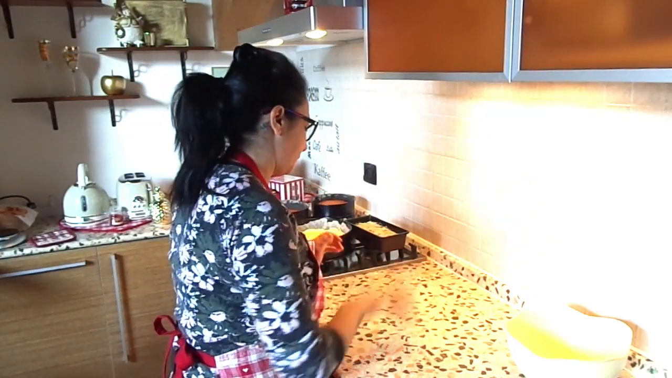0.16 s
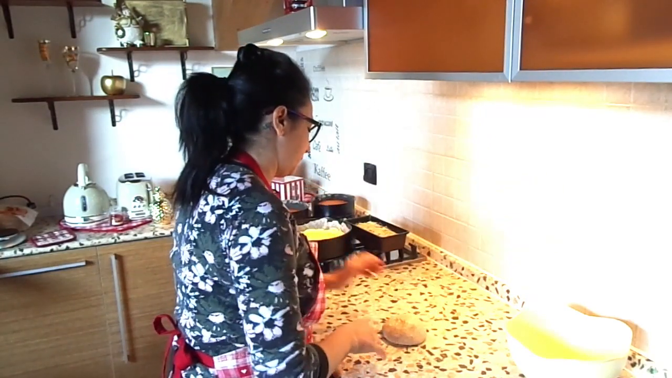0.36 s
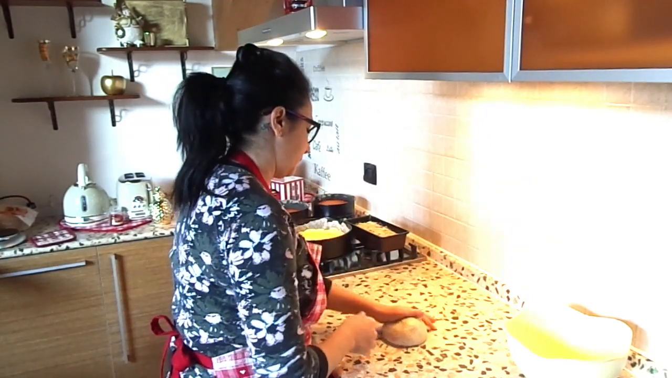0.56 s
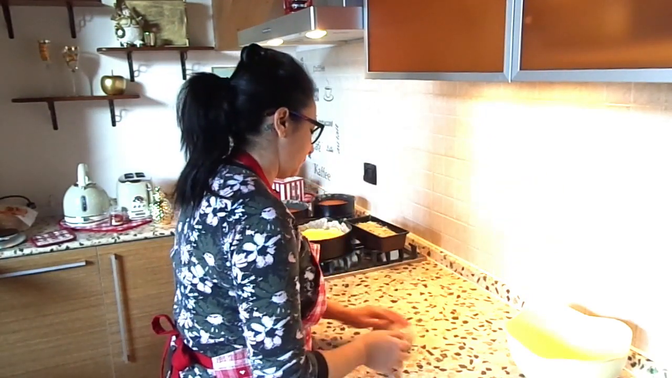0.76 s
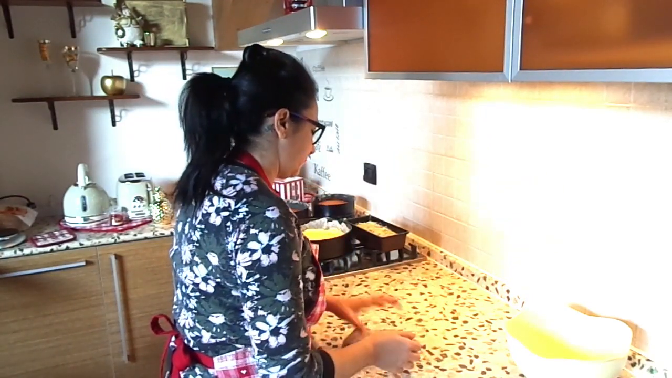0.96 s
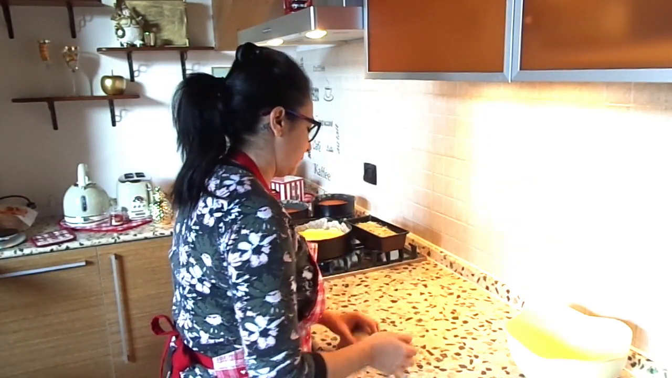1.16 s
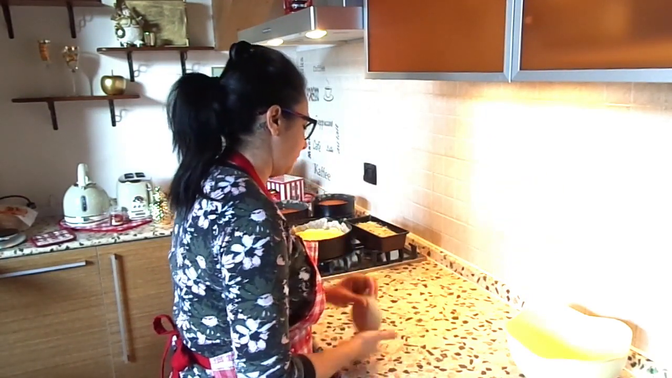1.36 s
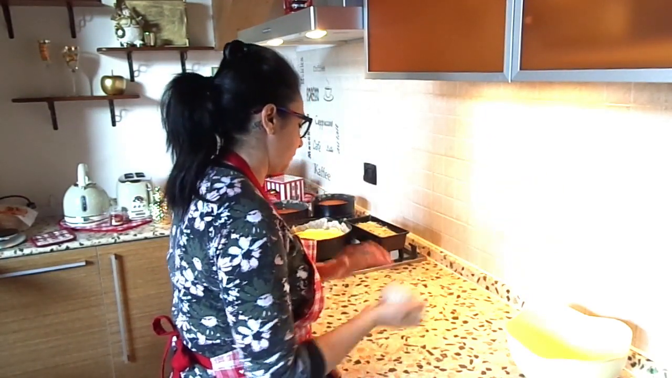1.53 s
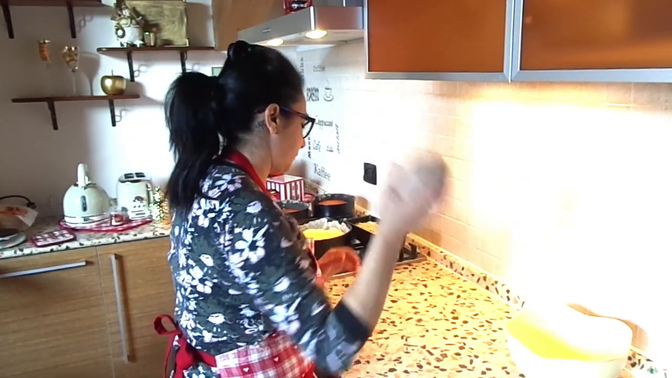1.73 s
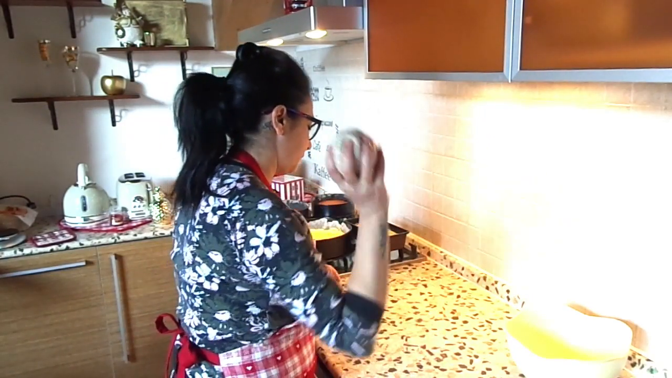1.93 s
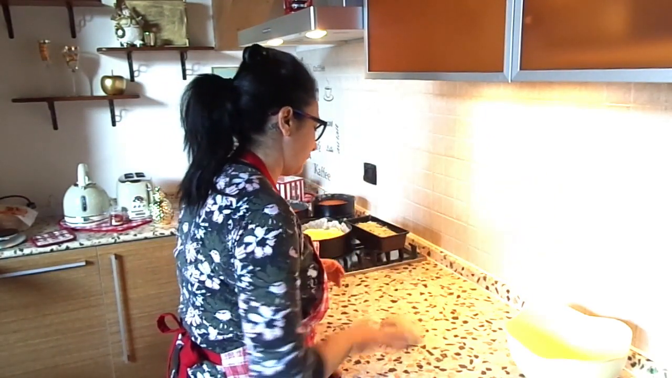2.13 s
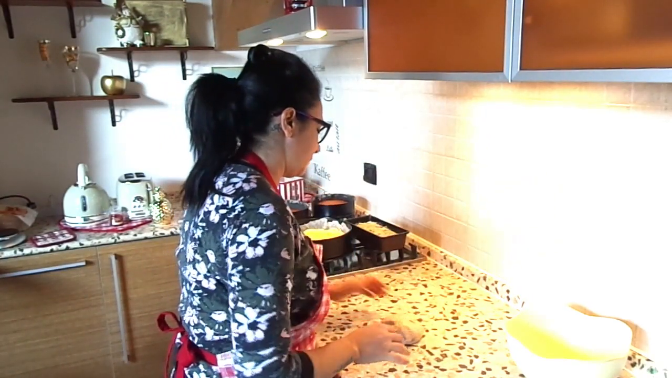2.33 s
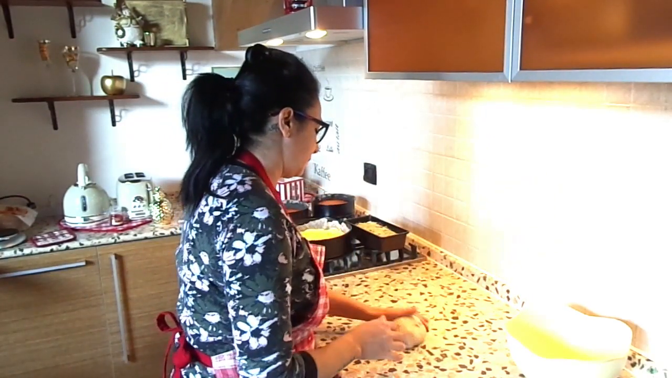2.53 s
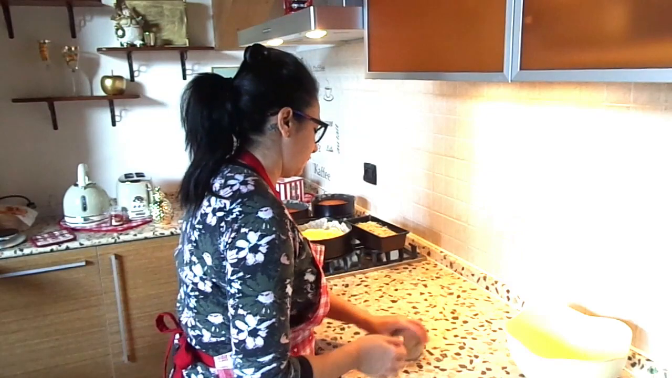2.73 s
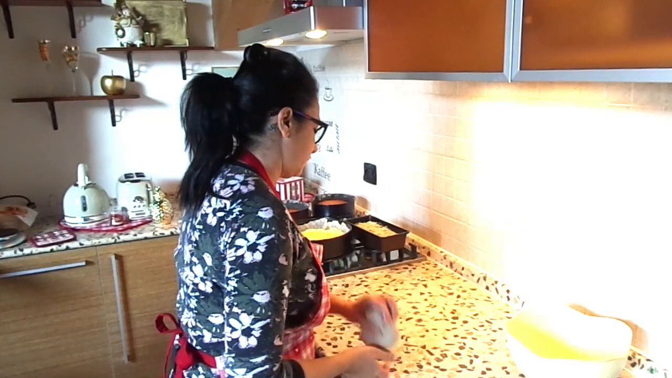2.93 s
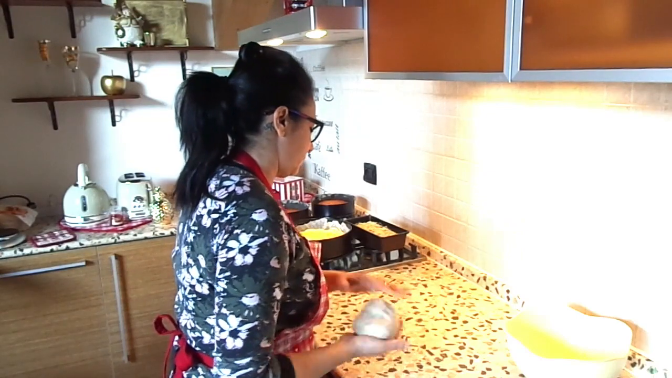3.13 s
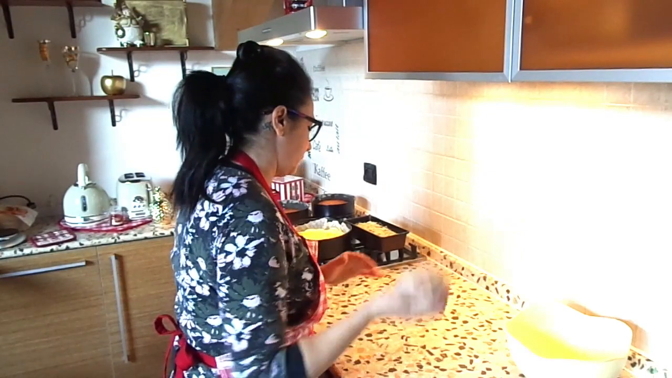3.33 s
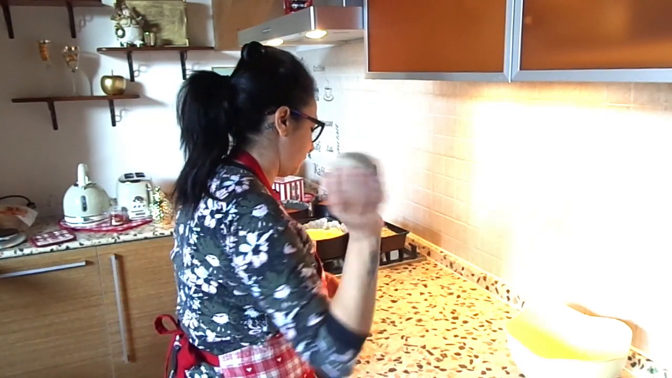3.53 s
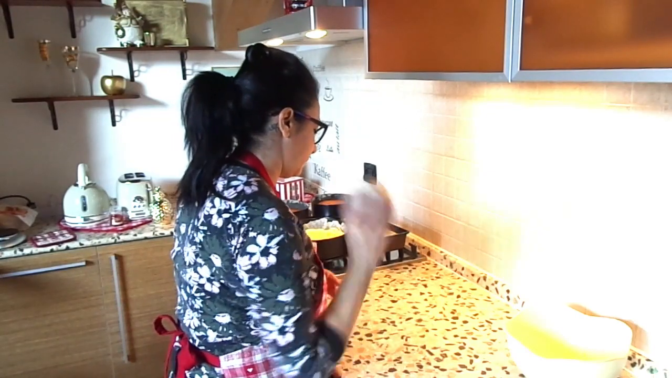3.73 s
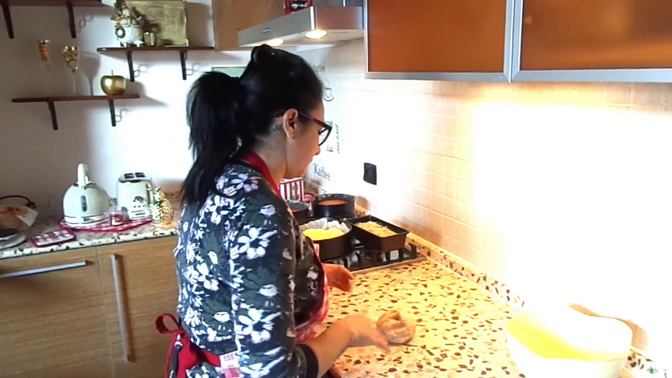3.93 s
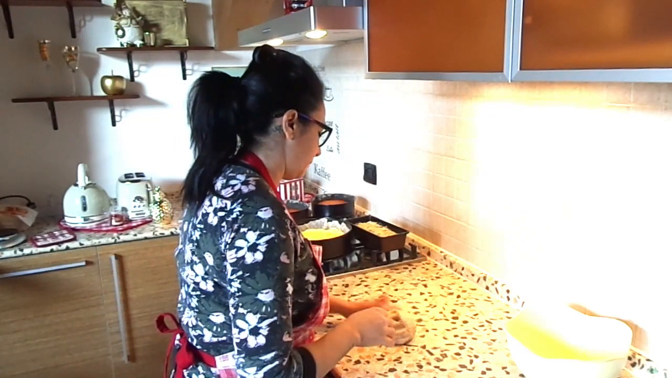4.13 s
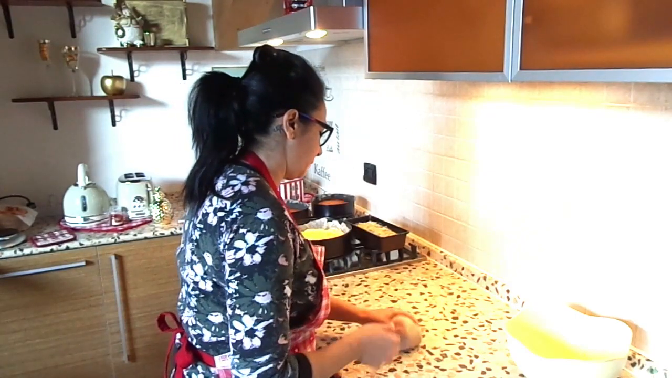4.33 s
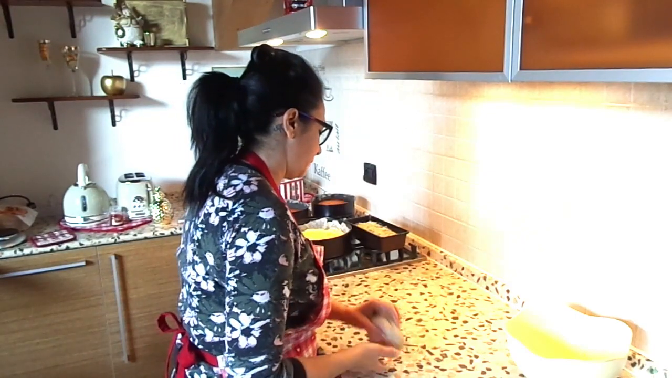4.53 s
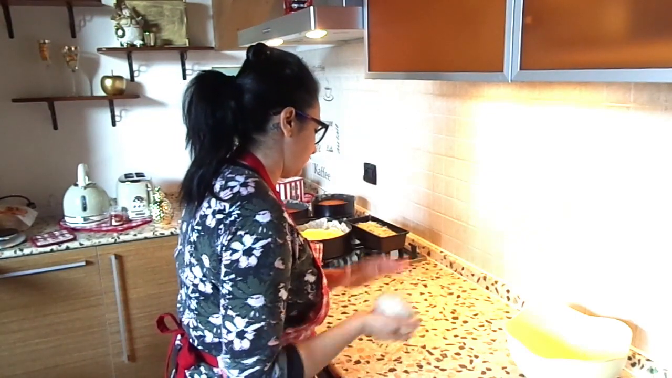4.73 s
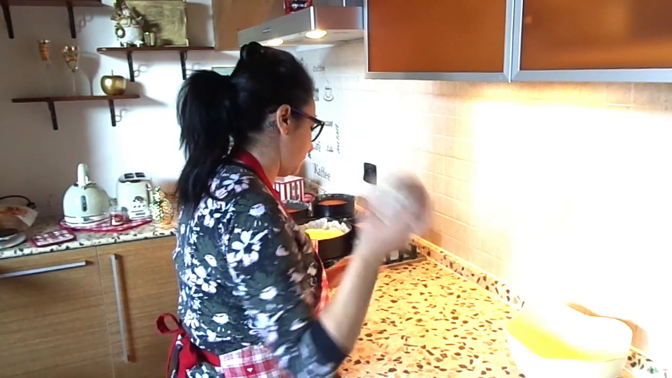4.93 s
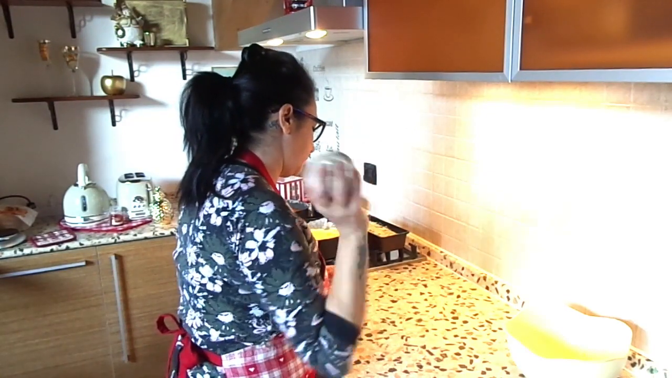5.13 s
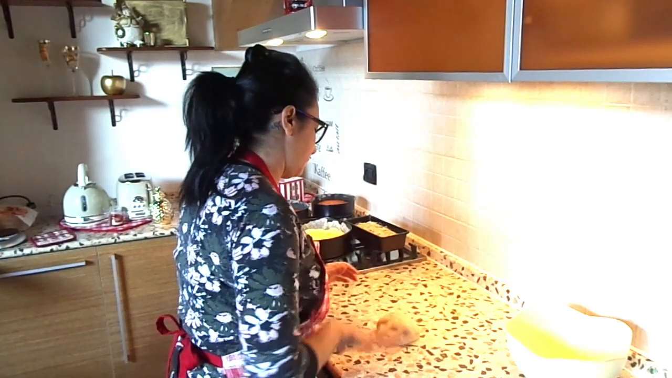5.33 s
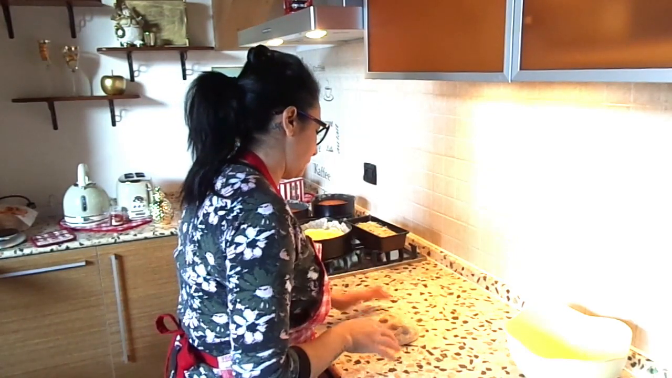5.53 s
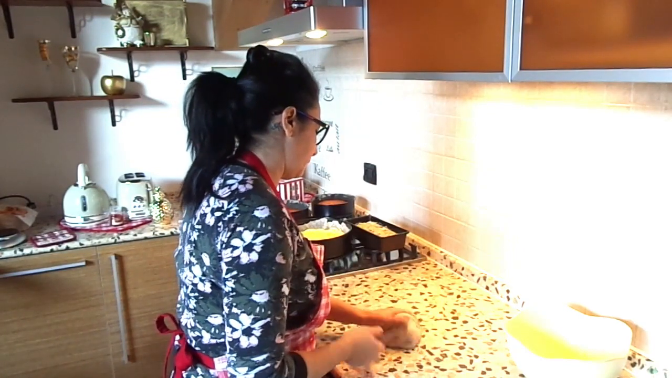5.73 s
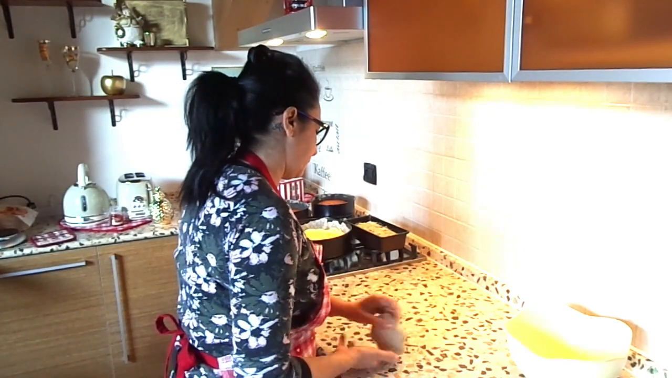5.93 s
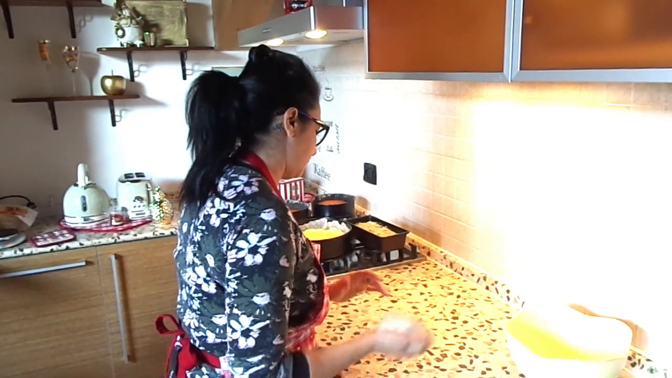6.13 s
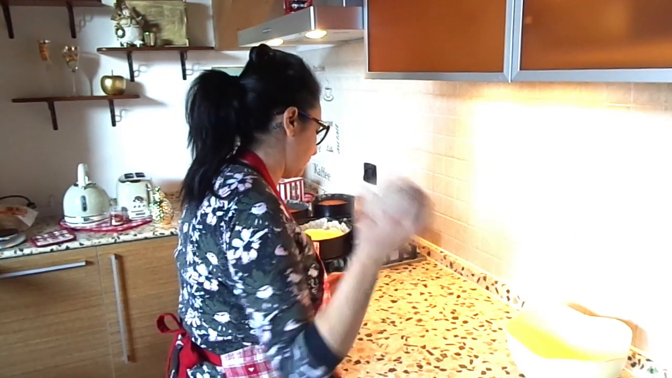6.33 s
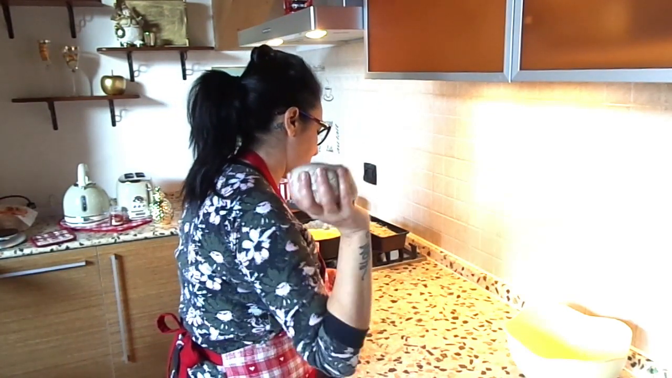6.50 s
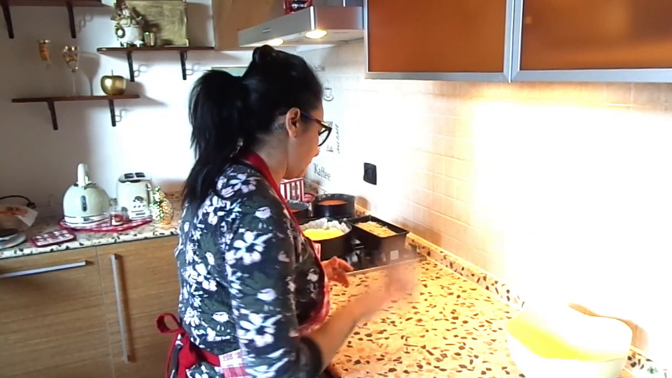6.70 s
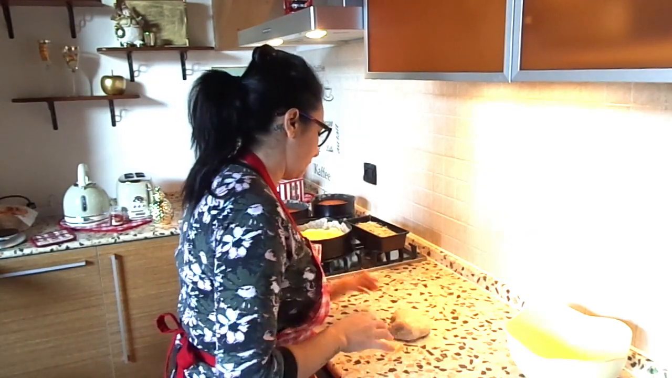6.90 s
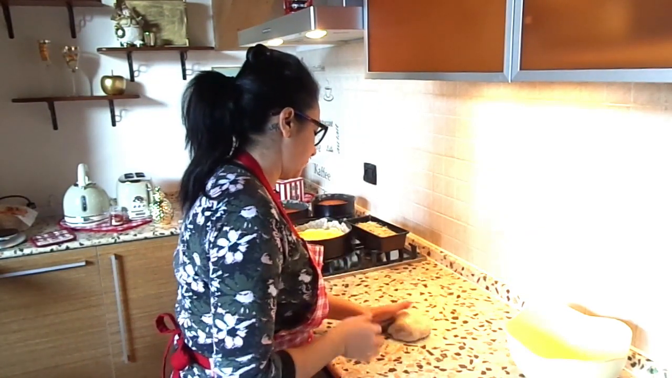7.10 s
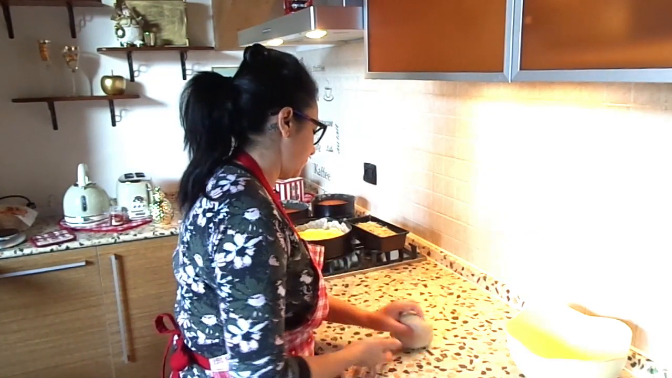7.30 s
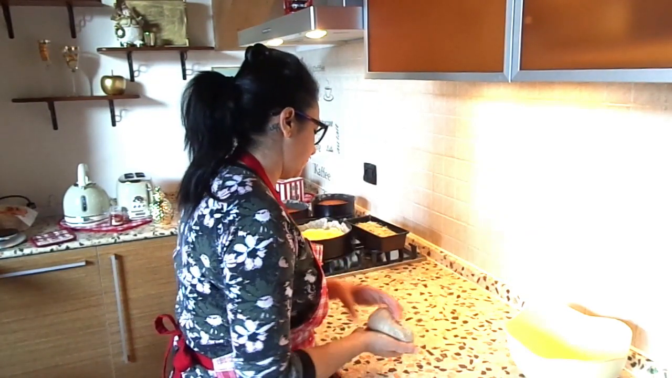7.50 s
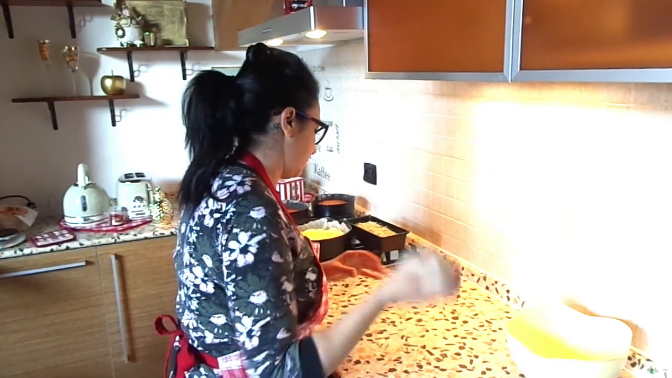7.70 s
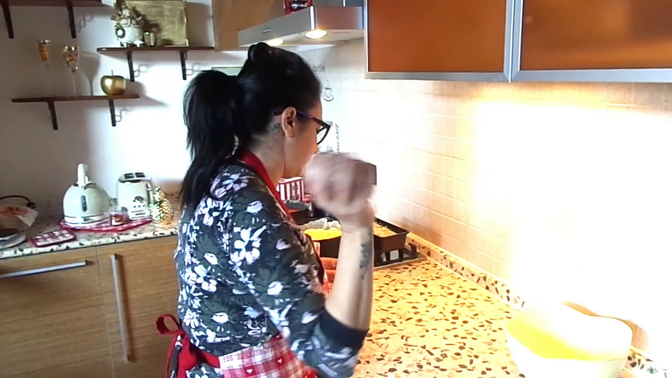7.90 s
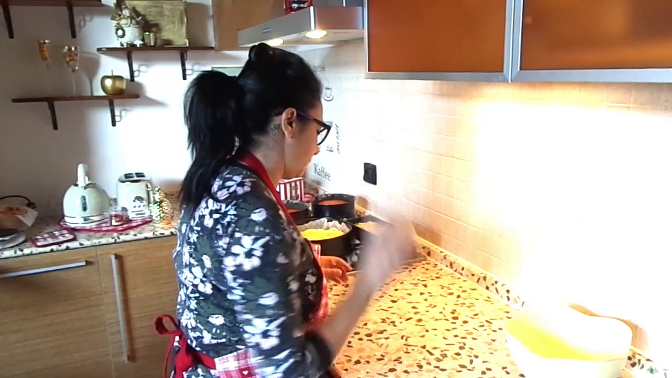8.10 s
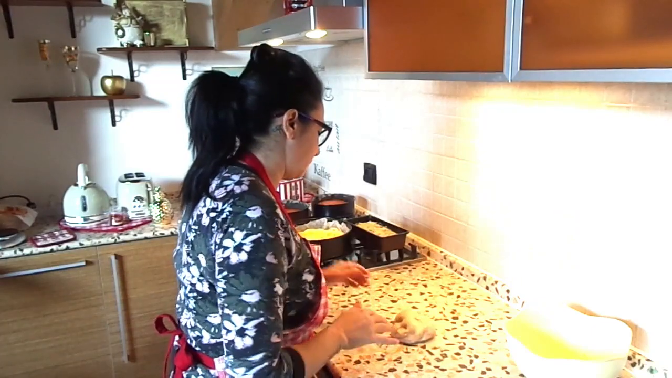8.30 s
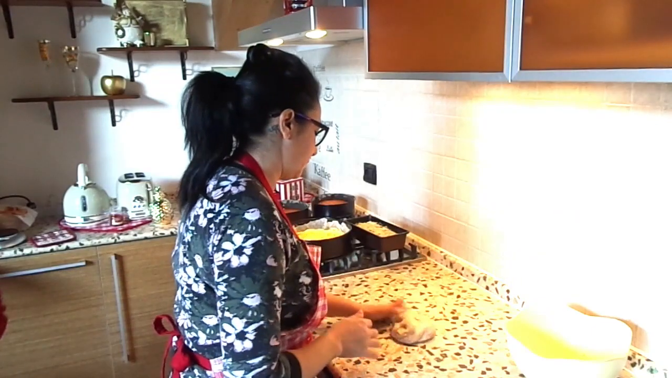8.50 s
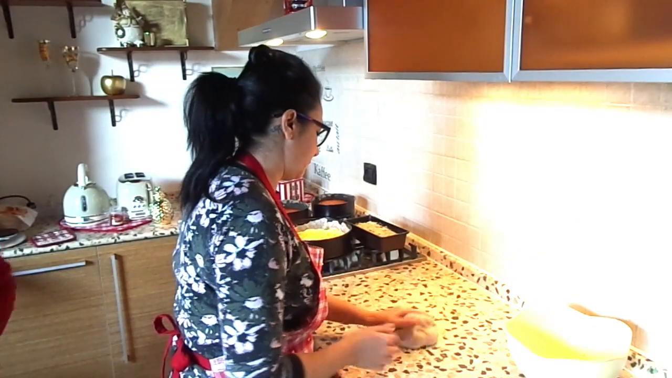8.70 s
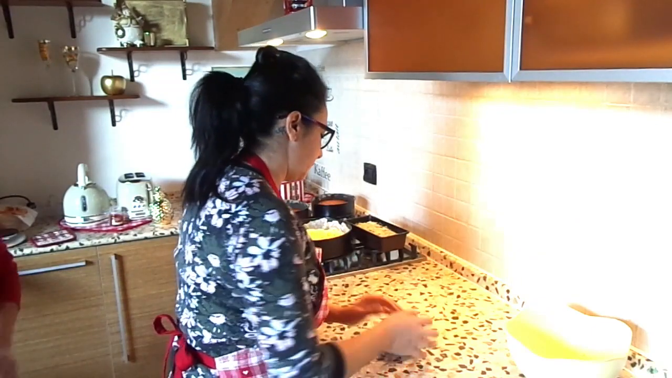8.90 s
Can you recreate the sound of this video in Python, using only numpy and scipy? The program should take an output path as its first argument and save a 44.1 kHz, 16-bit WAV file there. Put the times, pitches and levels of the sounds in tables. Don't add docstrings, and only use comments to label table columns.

```python
import sys
import numpy as np
from scipy import signal
from scipy.fft import rfft, irfft
from scipy.io import wavfile
from scipy.ndimage import uniform_filter1d

SR = 44100
rng = np.random.default_rng(int(sys.argv[2]) if len(sys.argv) > 2 else 0)


def volts_from_db(level):
    exponent = np.asarray(level, float) / 20
    return 10 ** exponent


def transcribe(signal):
    frames = np.atleast_2d(signal).T
    limited = np.clip(frames, -1, 1)
    pcm = np.round(limited * 32767).astype(np.int16)
    wavfile.write(sys.argv[1], SR, pcm)


N = 394694


def throws():
    # start_s, direct_crack_db, echo_body_db, echo_treble_db, echo_air_db
    blows = [
        (0.256, -39, -18.5, -17, -23.5),
        (2.199, 4, -13, -10.5, -12.5),
        (3.918, -16, -22.5, -25, -23),
        (5.389, -23, -16, -16, -14.5),
        (6.816, 4.5, -18, -15, -15),
        (8.249, -3, -17, -16.5, -21),
    ]
    # pitch_hz, level_db, t60_s
    cabinet = [(49.4, -6, 0.17), (73.6, 4, 0.33), (82.5, -1.5, 0.32), (100.2, -5.5, 0.48), (188.3, 2, 0.4),
               (255.3, 0, 0.43), (295, -3, 0.49), (329.4, 6.5, 0.29), (384.6, 5.5, 0.32)]
    # pitch_hz, level_db, t60_s
    worktop = [(456.5, -9.5, 0.29), (523.4, -5, 0.32), (551, -9, 0.34), (588.3, 1.5, 0.2),
               (630, -9.5, 0.43), (675, 5, 0.04), (807, -9, 0.38), (982, -2.5, 0.38), (1130, -17, 0.037),
               (1182, -1, 0.31), (1316, -7.5, 0.48), (1694, -8, 0.16)]
    rebound_s, rebound_length_s, rebound_hz, rebound_db = 0.25, 0.18, 71.7, -44.5
    direct, feed, thump, wood = np.zeros((4, N))
    pulse = crack(width_ms=0.085)
    t = np.arange(at(rebound_length_s)) / SR
    swing = np.sin(2 * np.pi * rebound_hz * t) * np.sin(np.pi * t / t[-1])
    all_lumps = rng.random((len(blows), 3, 2))
    for (s, crack_db, body_db, treble_db, air_db), lumps in zip(blows, all_lumps):
        thump_db = body_db - 14
        add(direct, s + rebound_s, volts_from_db(body_db + rebound_db) * swing)
        add(direct, s, -volts_from_db(crack_db - 34) * pulse)
        add(direct, s + 0.00028, volts_from_db(crack_db - 7) * pulse)
        add(direct, s + 0.00162, volts_from_db(crack_db - 11) * pulse)
        sound = colour([(60, thump_db + 40), (180, thump_db + 44.5), (330, thump_db + 43),
                        (570, body_db + 38.5), (900, body_db + 38.5), (1300, body_db + 40),
                        (2200, treble_db + 31), (3500, treble_db + 25),
                        (6500, air_db + 17), (11000, air_db + 8), (16000, air_db + 6)])
        late_lumps = sum((size - 0.5) * 0.5 * np.roll(sound, at(0.002 * when)) for when, size in lumps)
        add(feed, s, sound + late_lumps)
        add(thump, s, volts_from_db(thump_db - 38.5) * np.hanning(at(0.0033)))
        add(wood, s + 0.0012, volts_from_db(body_db - 29) * np.hanning(at(0.00037)))
    return direct + ring(thump, cabinet) + ring(wood, worktop), feed


def crack(width_ms):
    t = np.arange(-4, 8, 1000 / SR / width_ms)
    pulse = t * np.exp(-np.abs(t) * np.where(t < 0, 1.6, 1.7))
    sag = np.hanning(len(t))
    pulse = pulse - pulse.sum() * sag / sag.sum()
    return pulse / np.abs(pulse).max()


def pats():
    # start_s, direct_crack_db, palm_hollow_db, finger_slap_db, dough_thud_db
    slaps = [
        (6.024, -20.5, -21, -27, -41.5),
        (6.18, -9, -9, -22.5, -29),
    ]
    direct, feed = np.zeros((2, N))
    for s, crack_db, palm_db, finger_db, thud_db in slaps:
        air_db = finger_db - 5.5
        sound = colour([(90, thud_db + 12), (220, thud_db + 33.5), (450, thud_db + 38.5),
                        (700, palm_db + 28.5), (1050, palm_db + 37), (1450, palm_db + 36.5),
                        (1950, finger_db + 38.5), (2600, finger_db + 37), (3500, finger_db + 35),
                        (4900, air_db + 29), (7000, air_db + 22.5), (15000, air_db + 7.5)])
        add(direct, s, -volts_from_db(crack_db - 3) * sound / np.abs(sound).max())
        add(feed, s, sound)
    return direct, feed


def cups():
    # start_s, clatter_db, low_ring_db, high_ring_db
    landings = [(.272, -21, -40.5, -52), (0.286, -10, -37.5, -38.5), (2.215, -28, -48, -40),
                (2.229, -13.5, -39, -39), (3.951, -30, -69, -53), (5.406, -20, -41, -45),
                (5.422, -17, -50, -38.5), (6.83, -36, -52, -50), (6.862, -37, -54, -51),
                (8.262, -16.5, -41, -46), (8.286, -18, -49, -46)]
    # pitch_hz, level_db, t60_s
    crockery = [(3500, 2, 0.091), (5350, -3, 0.16), (5760, 0, 0.063), (6970, 1, 0.13), (8580, -4.5, 0.14),
                (11280, -0.5, 0.11), (11980, -11, 0.15)]
    twin_spread, twin_db = 0.0118, -1
    clatter, rings = np.zeros((2, N))
    strike = np.eye(1, at(0.5))[0]
    all_luck = rng.standard_normal((len(landings), len(crockery)))
    for (s, clatter_db, low_db, high_db), luck in zip(landings, all_luck):
        add(clatter, s, volts_from_db(clatter_db) * crack(width_ms=0.031))
        modes = []
        for (hz, db, t60), r in zip(crockery, luck):
            ring_db = low_db if hz < 6000 else high_db
            modes.append((hz * (1 + 0.0023 * r), db + 3 * r + ring_db, t60))
        twins = [(hz * (1 + twin_spread * r), db + twin_db, t60)
                 for (hz, db, t60), r in zip(modes, luck[::-1])]
        add(rings, s, ring(strike, modes + twins))
    return volts_from_db(-16) * clatter + rings, clatter + volts_from_db(-8) * rings


def touches():
    # start_s, peak_db, pitch_hz, fizz_db
    bag_snaps = [(0.4798, -27.5, 3600, -39), (0.729, -33, 3120, -37), (1.0898, -29, 4240, -44.5),
                 (1.403, -29, 4100, -40.5), (1.6526, -38, 2950, -50), (1.858, -33, 4400, -43),
                 (2.0787, -32, 4420, -40.5), (2.4396, -44.5, 1620, -52), (2.5227, -42, 5950, -61),
                 (2.5857, -31.5, 3260, -42.5), (2.977, -52, 1810, -66), (3.055, -30, 3570, -47),
                 (3.1704, -15.5, 3500, -29), (3.4491, -44, 3760, -66), (3.582, -34.5, 3080, -46),
                 (3.6142, -23.5, 2290, -34.5), (3.8092, -34.5, 3900, -61), (3.8735, -33, 2940, -49.5),
                 (4.2086, -33.5, 3300, -60), (4.2302, -34.5, 1520, -45), (4.4416, -30, 3220, -52),
                 (4.567, -34.5, 3000, -51), (4.682, -38, 3550, -49), (5.2505, -47, 3600, -73),
                 (5.3403, -55, 1700, -54), (5.8666, -50, 1710, -66), (7.2025, -47, 3380, -64)]
    # start_s, peak_db, pitch_hz
    presses = [(0.732, -48, 264), (1.1, -48, 272), (1.13, -49, 120), (1.655, -46, 340), (1.739, -60, 162),
               (2.512, -59, 270), (2.96, -35, 333), (2.97, -50.5, 90), (3.198, -57, 307), (3.598, -49, 231),
               (4.019, -32, 246), (4.099, -45, 357), (4.289, -41, 334), (5.289, -49, 178)]
    snaps, knocks = np.zeros((2, N))
    t = np.arange(at(0.12)) / SR
    noises = rng.standard_normal((len(bag_snaps), len(t)))
    for (s, db, hz, fizz_db), noise in zip(bag_snaps, noises):
        fizz = band(noise, 2400, 10700, order=1) * np.exp(-t / 0.021)
        add(snaps, s, volts_from_db(db + 1) * np.sin(2 * np.pi * hz * t) * np.exp(-t * hz / 1.9))
        add(snaps, s, volts_from_db(fizz_db - 2) * fizz)
    for s, db, hz in presses:
        swing = np.sin(2 * np.pi * hz * t) * np.exp(-t * hz / 3)
        add(knocks, s, volts_from_db(db - 11.5) * swing * np.tanh(t * hz))
    return band(snaps, 840, 18000), knocks


def bag(creases_per_s=5000, spread_db=2.5, patchy_db=1.3):
    # centre_hz, level_db
    ranges = [(200, -33.5), (300, -24), (430, -23), (600, -15.5), (820, -10.5), (1150, -2.5), (1550, -5),
              (2050, 0.5), (2600, -3.5), (3250, 0), (4100, -3), (5200, 0.5), (6500, -0.5), (8000, -3.5),
              (9800, 1.5), (12000, -4.5), (14200, -14)]
    out = np.zeros(N)
    size = volts_from_db(np.minimum(spread_db * rng.exponential(size=N), 11))
    clicks = (rng.random(N) < creases_per_s / SR) * size * rng.standard_normal(N)
    gain = handling()
    flutter = walk(per_s=90)
    for k, (hz, db) in enumerate(ranges):
        kind = np.searchsorted([2300, 4700, 8900], hz)
        crinkle = (-1) ** k * unit(band(clicks, hz / 1.212, hz * 1.242))
        level_db = db - 3 + patchy_db * (walk(per_s=40) + flutter)
        out += crinkle * gain[kind] * volts_from_db(level_db)
    return out


def handling():
    # start_s, hold_s, crinkle_db, big_folds_db, fine_creases_db (last two relative)
    grips = [(-.03, 0.018, -36.5, -4, -3), (0.142, 0.053, -46, -8, -5), (0.47, 0.035, -44.5, -1.5, -5.5),
             (0.717, 0.05, -32, -3, -5.5), (1.401, 0.036, -46.5, -6, -2.5), (1.645, 0.13, -36.5, -5, -4),
             (1.889, 0.059, -40.5, -2.5, -2.5), (2.048, 0.043, -41, -9, -5.5),
             (2.498, 0.06, -51.5, -9, 0.5), (2.58, 0.047, -47, -3, -7), (2.96, .01, -55.5, 0.5, -16),
             (3.056, 0.086, -44, -8, 4), (3.376, 0.052, -52.5, -3, -3.5), (3.566, 0.064, -38, -4.5, -4.5),
             (3.8, .02, -55.5, -4, -2), (3.87, .03, -44, -7, -7), (4.208, .01, -54, -15, -10),
             (4.23, 0.086, -40, -3.5, -6.5), (4.43, 0.075, -46, -8, -2.5), (4.57, 0.073, -51, -2.5, -2),
             (4.676, 0.041, -47.5, -3.5, -4.5), (4.825, 0.023, -51.5, -11, -1),
             (5.255, 0.023, -59.5, 3, -9), (5.328, .03, -56.5, 5, -14)]
    # loudest_s, swell_s, crinkle_db, big_folds_db, fine_creases_db
    pulls = [
        (1.054, 0.42, -41, -6.5, -5),
        (1.259, 0.31, -35.5, -3.5, -3.5),
        (3.202, 0.16, -32.5, -7, -5),
        (4.04, 0.1, -36.5, -5, -3),
    ]
    attack_s, settle_db_per_s, swell_db = 0.015, 157, 17
    hiss_db = -5
    t, gain = np.arange(N) / SR, np.zeros((4, N))
    shapes = []
    for s, hold, *levels in grips:
        rise = np.clip((t - s) / attack_s, 0, 1)
        settle = volts_from_db(-settle_db_per_s * np.maximum(t - s - attack_s - hold, 0))
        shapes.append((rise * settle, levels))
    for s, swell, *levels in pulls:
        rise_db = -swell_db * ((t - s) / swell) ** 2
        shapes.append((volts_from_db(np.where(t < s, rise_db, -settle_db_per_s * (t - s))), levels))
    for shape, (crinkle_db, folds_db, fine_db) in shapes:
        relative_db = np.array([[folds_db], [0], [fine_db], [fine_db + hiss_db]])
        gain += (shape * volts_from_db(crinkle_db + relative_db)) ** 2
    return np.sqrt(gain)


def fan():
    # pitch_hz, level_db (per Hz)
    air_curve = [(18, -45), (30, -27), (87, -14.5), (241, -12.5), (321, -13.5), (474, -7.5), (737, -11),
                 (885, -8.5), (1060, -12), (1210, -7.5), (1650, -13.5), (1980, -13), (3700, -17.5),
                 (11900, -23.5), (15100, -29)]
    # pitch_hz, width_hz, level_db
    duct = [(504, 16, -66.5), (604, 27, -72), (98.5, 13, -79)]
    # pitch_hz, level_db
    lines = [(1001, -74), (1200, -84), (2525, -84), (10034, -92), (12258, -97), (12290, -79)]
    air_db, waver_db = -57, 0.6
    hz, db = np.transpose(air_curve[:-1])
    f = np.fft.rfftfreq(N, 1 / SR)
    tilt = volts_from_db(np.interp(np.log(f + 1), np.log(hz), db))
    air = unit(irfft(rfft(rng.standard_normal(N)) * tilt, N))
    slow = uniform_filter1d(rng.standard_normal(N), size=4000)
    waver = unit(uniform_filter1d(slow, size=4000))
    out = volts_from_db(air_db + waver_db * waver) * air
    for hz, width, db in duct:
        out += volts_from_db(db) * unit(band(rng.standard_normal(N), hz - width / 2, hz + width / 2, order=1))
    for hz, db in lines:
        out += volts_from_db(db + 3) * np.sin(2 * np.pi * hz * np.arange(N) / SR)
    return out


def room(first_ms=0.67, dense_ms=25, early_db=4, early_ms=12):
    # centre_hz, t60_s, level_db
    octaves = [(60, 0.46, -13.5), (151, 0.61, 9), (300, 0.46, 9), (600, 0.33, -13), (1160, 0.4, -2.5),
               (2610, 0.39, 3), (4950, 0.42, 5), (9700, 0.25, 5.5)]
    t = np.arange(at(1)) / SR
    crowd = np.clip(0.13 + (t * 1000 / dense_ms) ** 2 * 0.2, 0, 1)
    echoes = np.tanh(rng.standard_normal(len(t))) * (rng.random(len(t)) < crowd) / np.sqrt(crowd)
    echoes = echoes * (t > first_ms / 1000)
    echoes = echoes * volts_from_db(early_db * np.exp(-t * 1000 / early_ms))
    tail = np.zeros(len(t))
    for hz, t60, db in octaves:
        tail += volts_from_db(db) * band(echoes * 1000 ** (-t / t60), hz / 1.99, hz * 1.81, order=1)
    return tail / np.sqrt(np.sum(tail ** 2))


def at(s):
    return int(s * SR)


def unit(x):
    return x / np.sqrt(np.mean(x ** 2))


def add(out, s, sound):
    i = at(s)
    out[i:i + len(sound)] += sound[:len(out) - i]


def band(x, lo_hz, hi_hz, order=2):
    sos = signal.butter(order, [lo_hz, min(hi_hz, 20000)], "bandpass", fs=SR, output="sos")
    return signal.sosfilt(sos, x)


def ring(x, modes):
    t = np.arange(at(1)) / SR
    answer = sum(volts_from_db(db) * np.sin(2 * np.pi * hz * t) * 1000 ** (-t / t60) for hz, db, t60 in modes)
    return signal.fftconvolve(x, answer)[:len(x)]


def colour(points):
    hz, db = np.transpose(points)
    gain = volts_from_db(np.interp(np.log(np.fft.rfftfreq(4096, 1 / SR) + 1), np.log(hz), db))
    fold = irfft(np.log(gain)) * np.r_[1, 2 * np.ones(2047), 1, np.zeros(2047)]
    return irfft(np.exp(rfft(fold)))[:2048]


def walk(per_s):
    k = SR // per_s
    steps = np.repeat(rng.standard_normal(N // k + 1), k)
    return unit(uniform_filter1d(steps, size=k)[:N])


def scene():
    hit, hit_feed = throws()
    pat, pat_feed = pats()
    cup, cup_feed = cups()
    snaps, knocks = touches()
    sheet = bag()
    place = np.pi / 4 * (1 + np.tanh(walk(per_s=6)))
    rustle = volts_from_db(5.5) * snaps + volts_from_db(0.5) * knocks + volts_from_db(-5) * sheet
    feeds = hit_feed + cup_feed, pat_feed, rustle * np.cos(place), rustle * np.sin(place)
    echo = sum(signal.fftconvolve(feed, room())[:N] for feed in feeds)
    direct = hit + pat + cup + snaps + volts_from_db(3.5) * knocks + volts_from_db(-3) * sheet
    mono = direct + echo + fan()
    return np.array([mono, mono])


def roll_off(x):
    return signal.sosfilt(signal.butter(12, 16360, fs=SR, output="sos"), x)


def record(dry):
    late = np.roll(dry[0], at(0.003))
    side = volts_from_db(-32) * band(late, 40, 3200, order=1)
    side += volts_from_db(-28.5) * band(late, 2300, 12000, order=1)
    side += volts_from_db(-23.5) * band(late, 8800, 16000, order=1)
    bass_cut = signal.butter(8, 39, "highpass", fs=SR, output="sos")
    top_cut = signal.ellip(6, 0.1, 25, 15000, fs=SR, output="sos")
    both = signal.sosfilt(bass_cut, dry + np.array([side, -side]))
    both = signal.sosfiltfilt(top_cut, both)
    return roll_off(both - 0.0005)


dry = scene()
out = record(dry)
transcribe(out)
```